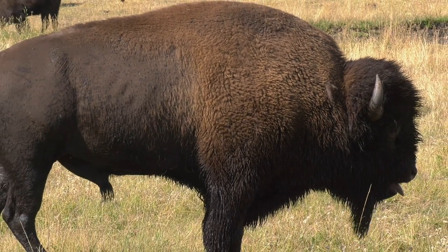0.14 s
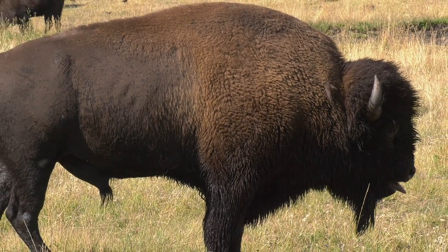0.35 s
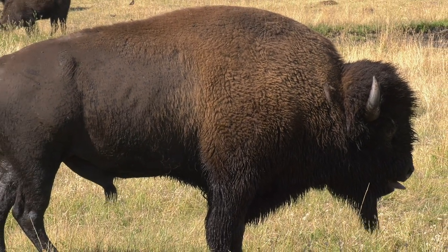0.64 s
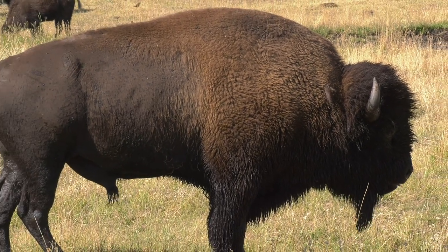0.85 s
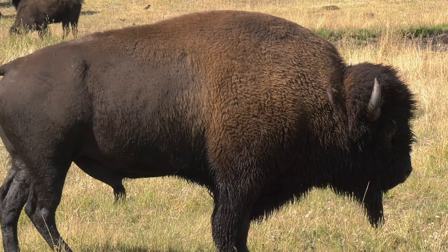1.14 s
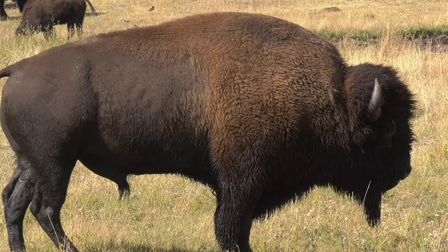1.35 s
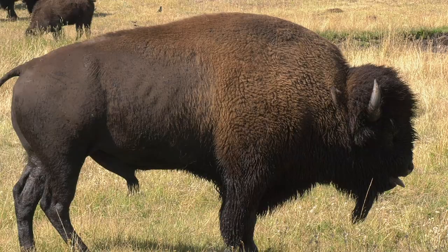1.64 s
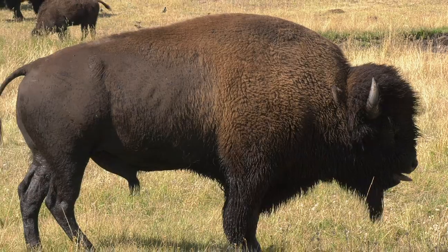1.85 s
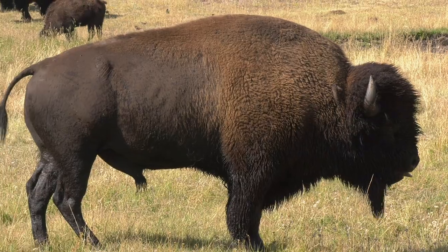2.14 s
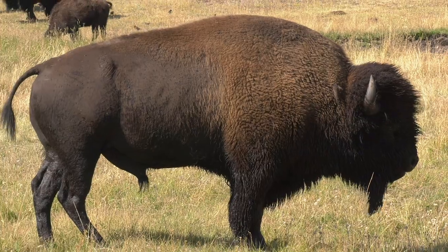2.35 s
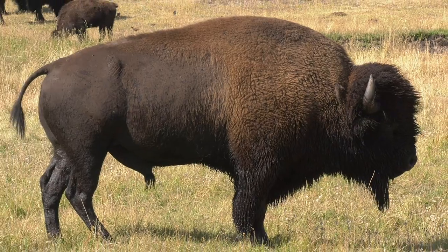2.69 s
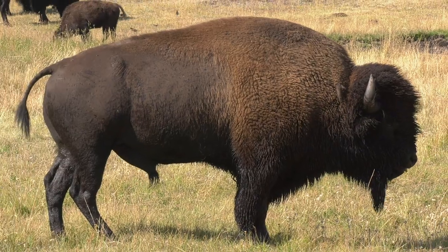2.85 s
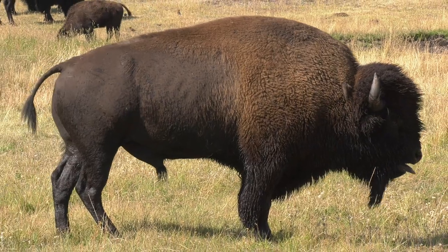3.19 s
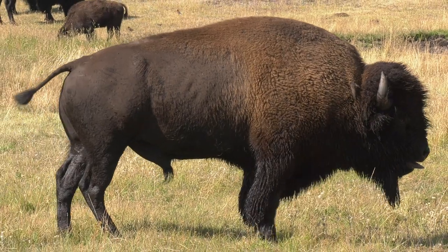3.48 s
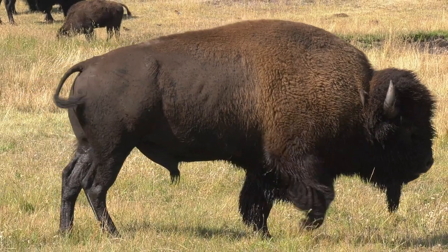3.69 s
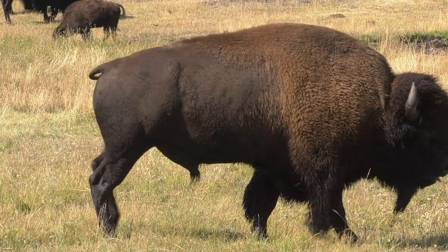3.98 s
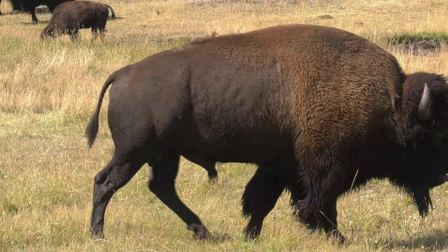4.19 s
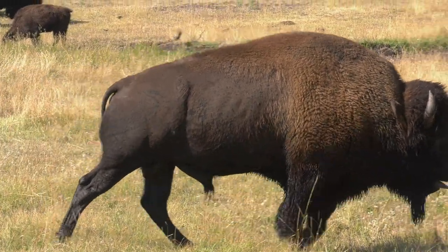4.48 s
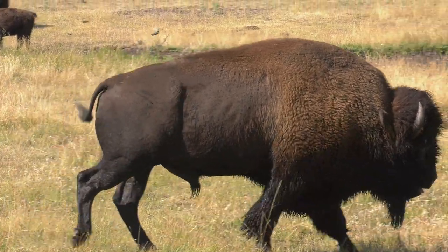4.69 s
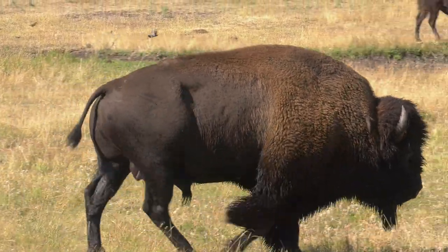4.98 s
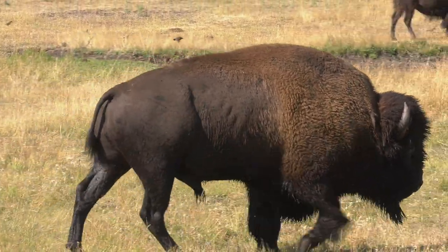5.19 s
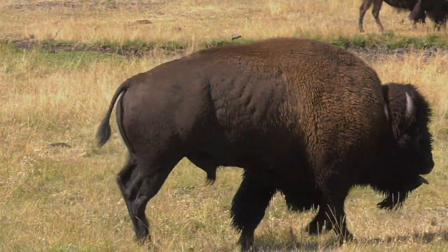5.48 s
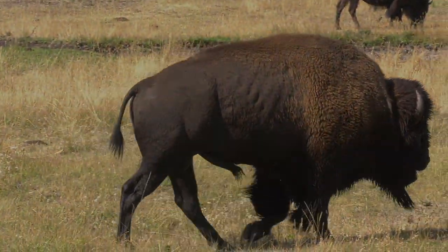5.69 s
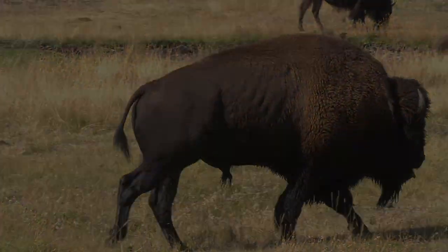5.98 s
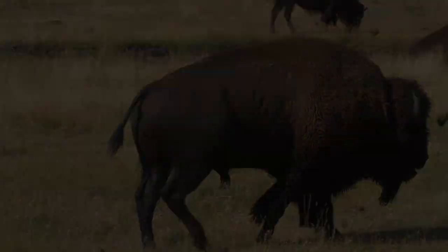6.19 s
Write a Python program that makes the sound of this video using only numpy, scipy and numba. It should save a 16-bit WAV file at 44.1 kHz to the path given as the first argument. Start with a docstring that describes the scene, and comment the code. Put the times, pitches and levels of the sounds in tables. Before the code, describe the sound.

Deep throaty bison grunts and breathy huffs, a quick sniff, then a harsh overloaded roar, with faint bird chirps in an open rumbling meadow.

```python
"""Open meadow: far bison rumble and bellow, dry grass rustles and a small bird gives thin falling chirps throughout.
Close to the microphones, on the left, a bison bull gives four short grunts, each ending in a huff; he sniffs
after the second. Last comes his long rasping roar. His slack vocal folds flap in slow pulses that ring the throat,
rough air sounds the mouth, and single heavy slaps of the folds are loud enough to be clipped on the left."""
import sys
import numpy as np
from scipy import signal
from scipy.fft import rfft, irfft
from scipy.io import wavfile
from scipy.ndimage import uniform_filter1d
from numba import njit

SR = 44100
rng = np.random.default_rng(int(sys.argv[2]) if len(sys.argv) > 2 else 0)


def unload_audio(sound):
    """Save the sound as a 16-bit wav file, at the path given as the first command line argument."""
    columns = np.transpose(np.atleast_2d(sound))
    # keep every value between -1 and 1, then stretch to whole-number steps
    steps = np.round(np.clip(columns, -1, 1) * 32767)
    wavfile.write(sys.argv[1], SR, steps.astype(np.int16))


N = 279573
TIME = np.arange(N) / SR


def from_db(db):
    """Decibels to gain."""
    return 10 ** (np.asarray(db) / 20)


def rms_one(x):
    """Scale to an rms of 1."""
    return x / np.sqrt(np.mean(x ** 2) + 1e-20)


def in_time(rows):
    """Each column of a curve at every sample."""
    s, *columns = np.transpose(rows)
    return [np.interp(TIME, s, c) for c in columns]


def during(rows):
    """1 while a curve lasts, with soft edges."""
    lasts = (TIME > rows[0][0]) & (TIME < rows[-1][0])
    return uniform_filter1d(1. * lasts, size=400)


def envelope(s, attack_s, hold_s, release_s):
    """Full from s for the hold; attack and release each span 20 dB."""
    away = np.maximum((s - TIME) / attack_s, (TIME - s - hold_s) / release_s)
    return from_db(-20 * np.clip(away, 0, 10))


def at_hz(points):
    """A spectrum table at every Fourier bin, interpolated over log frequency."""
    hz, value = np.transpose(points)
    return np.interp(np.log(np.fft.rfftfreq(N, 1 / SR) + 1), np.log(hz), value)


def noise(colour):
    """Noise of a given spectrum, rms 1."""
    spectrum = rfft(rng.standard_normal(N)) * from_db(at_hz(colour))
    return rms_one(irfft(spectrum, N))


def low_pass(x, hz, order=2):
    """Butterworth low-pass."""
    return signal.sosfilt(signal.butter(order, min(hz, SR / 3), fs=SR, output="sos"), x + 1e-18)


def high_pass(x, hz, order=2):
    """Butterworth high-pass."""
    return signal.sosfilt(signal.butter(order, hz, "high", fs=SR, output="sos"), x + 1e-18)


def drift(hz):
    """Slow chance, spread 1."""
    return rms_one(low_pass(rng.standard_normal(N), hz))


def resonate(x, modes):
    """Parallel resonances of alternating sign."""
    out = 0
    for k, (hz, width, db) in enumerate(modes):
        r = np.exp(-np.pi * width / SR)
        poles = [1, -2 * r * np.cos(2 * np.pi * hz / SR), r * r]
        gain = (-1) ** k * from_db(db) * (1 - r * r) / 2
        out = out + gain * signal.lfilter([1, 0, -1], poles, x + 1e-18)
    return out


@njit
def glide(x, hz, width):
    """One resonance whose centre moves."""
    out, state = np.zeros(len(x)), 0j
    for i in range(len(x)):
        if x[i] != 0 or abs(state) > 1e-9:
            state = state * np.exp((-np.pi * width + 2j * np.pi * hz[i]) / SR) + x[i]
            out[i] = state.imag
    return out


def even(x):
    """Take the slow level out, keep the single pulses."""
    return x / np.sqrt(np.abs(uniform_filter1d(x * x, size=2000)) + 0.0015 * np.max(x * x))


def folds(rows, jitter, shimmer_db, width_hz):
    """Uneven fold pulses ring the throat and thump the chest; returns the pulses and the low voice."""
    rate, throat_hz, db = in_time(rows)
    flapping = (TIME > rows[0][0]) * (TIME < rows[-1][0])
    cycles = np.cumsum(rate * (1 + jitter * drift(30)) * flapping) / SR
    pulses = np.diff(np.ceil(cycles), prepend=0) * from_db(shimmer_db * rng.standard_normal(N))
    chest = from_db(-5) * glide(pulses, .7 * throat_hz, 70.)
    body = high_pass(glide(pulses, throat_hz, width_hz) + chest, np.min(throat_hz) / 2)
    return pulses, even(low_pass(body, 259, order=4)) * from_db(db) * during(rows)


# far bellows, each sinking in tone: t/s, length/s, pulse f/Hz, start f/Hz, end f/Hz, peak level/dB
FAR_BELLOWS = [(0.438, 0.1, 80, 88, 76, -20.5), (.53, 0.31, 52.6, 244, 133, -20),
               (2.12, 0.16, 82, 108, 72, -24.5)]
# they peak at this share of their length, after a small swell and before a deep fade
FAR_PEAK_SHARE, FAR_SWELL_DB, FAR_FADE_DB = 0.63, 7, 20


def far_bellow(s, length, rate, start_hz, end_hz, db):
    """Only the low voice of a far bull carries: it swells, sinks in tone and fades."""
    effort = [(0, -FAR_SWELL_DB), (FAR_PEAK_SHARE, 0), (1, -FAR_FADE_DB)]
    rows = [(s + u * length, rate, start_hz + u * (end_hz - start_hz), db + effort_db)
            for u, effort_db in effort]
    return folds(rows, jitter=.14, shimmer_db=2.5, width_hz=26.)[1]


# spectrum of the distant bed: f/Hz, relative level/dB
MEADOW = [(12, -55), (20, -4.5), (37, -44), (60, -2), (107, -2.5), (163, 2), (187, -3.5), (216, -6.5),
          (357, -16.5), (513, -20), (1610, -34.5), (2910, -40), (4810, -43), (11400, -46), (16000, -48)]
# left microphone against right: f/Hz, level difference/dB
MEADOW_SIDE = [(60, 15.7), (110, 7.7), (200, 5.6), (380, 9.7), (700, 8.1), (1290, 11.7), (2380, 5.2),
               (4400, 3.9), (8120, 3.8), (15000, 3.2)]
# likeness of the two microphones: f/Hz, correlation (-1 to 1)
MEADOW_LIKENESS = [(60, -0.29), (130, 0.27), (290, 0.3), (640, 0.2), (1410, -0.22), (3100, -0.03),
                   (6820, -0.17), (15000, 0.016)]
MEADOW_DB = -27   # average of both sides, before the slow drift


def herd():
    """Far bulls blend into a low rumble under a faint hiss; a few bellows stand out."""
    alike, side_db = np.clip(at_hz(MEADOW_LIKENESS), -1, 1), at_hz(MEADOW_SIDE)
    mid, side = rfft(noise(MEADOW)), rfft(noise(MEADOW))
    flip = np.array([[1], [-1]])   # left, right
    spread = np.sqrt(1 + alike) * mid + flip * np.sqrt(1 - alike) * side
    bed = irfft(spread * from_db(flip * side_db / 2), N)
    bed = bed / np.std(bed.mean(axis=0)) * from_db(MEADOW_DB + drift(1.15))
    far = sum(far_bellow(*row) for row in FAR_BELLOWS)
    return bed + far * from_db([[3], [-6]])


# dry grass under hooves and tail: t/s, length/s, centre f/Hz, level/dB before the left and right gains
RUSTLES = [(0.443, .094, 3470, -54.5), (1.282, 0.096, 2800, -54.5), (2.603, 0.088, 2900, -62),
           (3.986, .35, 7850, -58.5), (4.636, .099, 2820, -50.5), (4.688, 0.29, 8900, -58.5),
           (4.949, .069, 2490, -51.5), (5.118, 0.0078, 1310, -37.5)]


def grass(grain_db):
    """Dry stalks brush and snap in short grainy swishes."""
    out = np.zeros(N)
    for s, length, hz, db in RUSTLES:
        n = int(length * SR)
        grains = rng.standard_normal(n) * from_db(grain_db * rng.standard_normal(n)) * np.hanning(n)
        swish = rms_one(resonate(grains, [(hz, 0.29 * hz, 0)]))
        out[int(s * SR):int(s * SR) + n] += from_db(db) * swish
    return out


def whistle(s, hz, db, upper_ratio):
    """One bird note along a pitch line; the two sides of the syrinx waver and sing slightly apart."""
    u = np.linspace(0, 1, len(hz))
    waver = 1 + .014 * rms_one(low_pass(rng.standard_normal((2, len(u))), 400))
    cycles = np.cumsum(hz * waver * [[1], [upper_ratio]], axis=1) / SR
    lower, upper = np.sin(2 * np.pi * cycles)
    note = from_db(db) * np.sqrt(4 * u * (1 - u)) * (lower + .5 * upper)
    return np.pad(note, (int(s * SR), N))[:N]


# falling chirps: t/s, length/s, f/Hz they fall towards, level/dB before the left and right gains
CHIRPS = [(.241, 0.059, 8100, -42.5), (0.57, 0.068, 8800, -50), (1.518, .054, 8840, -43),
          (1.875, .057, 7840, -43.5), (3.09, .085, 8660, -50.5), (4.4, 0.063, 7560, -46),
          (4.92, .067, 8400, -54)]
CHIRP_START_RATIO = 1.12
# one lower, arched peep: t/s, length/s, foot f/Hz, top f/Hz, level/dB before the left and right gains
PEEP = (.517, .055, 5300, 6100, -52)


def bird(bend, upper_ratio):
    """The peep rises and falls; each chirp falls fast and levels off."""
    s, length, foot_hz, top_hz, db = PEEP
    arch = np.sin(np.linspace(0, np.pi, int(length * SR)))
    out = whistle(s, foot_hz + (top_hz - foot_hz) * arch, db, upper_ratio)
    for s, length, end_hz, db in CHIRPS:
        fall = np.exp(-bend * np.linspace(0, 1, int(length * SR)))
        out = out + whistle(s, end_hz * (1 + (CHIRP_START_RATIO - 1) * fall), db, upper_ratio)
    return out


def scatter(x, t60, dull_hz):
    """Ground and grass send back a weak dull tail, different on each side."""
    decay = from_db(-60 * TIME[:SR] / t60)
    tail = low_pass(rng.standard_normal((2, SR)), dull_hz) * decay
    tail = tail / np.sqrt(np.sum(decay ** 2))
    return signal.fftconvolve(x[None], tail, axes=1)[:, :N]


# the sniff after the second grunt: t/s, length/s, level/dB before the microphone gains
SNIFF = (2.052, 0.11, -35)
# spectrum of the nostril air: f/Hz, relative level/dB
SNIFF_COLOUR = [(100, -10), (300, 16), (700, -2), (1100, -6), (1450, 1.5), (2200, -26), (3400, -10.5),
                (4600, -12), (6000, -20), (9000, -20), (14000, -36)]
SNIFF_ATTACK_S, SNIFF_RELEASE_S = 0.046, .12


def sniff():
    """A short pull of air through the bull's nostrils."""
    s, length, db = SNIFF
    return from_db(db) * envelope(s, SNIFF_ATTACK_S, length, SNIFF_RELEASE_S) * noise(SNIFF_COLOUR)


# air as the grunts end: t/s, length/s, rush level/dB, parted lips level/dB (before flutter and gains)
HUFFS = [(0.301, 0.0096, -25, -34), (0.349, 0.036, -30.5, -39.5), (1.692, 0.014, -25, -34),
         (1.744, 0.034, -35, -34), (3.123, 0.022, -37, -45), (3.183, 0.0095, -31, -35.5),
         (3.227, 0.046, -27.5, -38), (4.215, 0.041, -32.5, -34), (4.349, 0.04, -29, -31.5)]
# spectrum of rushing air, also in the slaps and the roar: f/Hz, relative level/dB
HUFF_COLOUR = [(150, -7), (290, 9.5), (380, -13.5), (580, -3), (780, -15), (950, 5.5), (1250, -1),
               (1720, -9.5), (1950, -16), (2700, -17), (3700, -33), (5000, -27.5), (9000, -40),
               (16000, -45)]
# resonances of the parted lips: f/Hz, width/Hz, relative level/dB
LIPS = [(600.7, 29, 10), (1040, 220, -5.5), (1155, 24, -9), (1453, 54, 4), (1660, 108, 4.5),
        (2200, 340, -10), (2640, 72, -12.5), (2860, 110, -13), (4960, 420, -21.5)]
# a huff rises and dies by 20 dB in these multiples of its length
HUFF_RISE, HUFF_FALL = 0.75, 2.54
# the dull puff in each huff, level relative to its rush
PUFF_DB, PUFF_HZ = -1.5, 330


def huffs(flutter_db):
    """Unvoiced air rushes out in a fluttering stream with a dull puff and sounds the parted lips."""
    puff = rms_one(low_pass(rng.standard_normal(N), PUFF_HZ))
    rush = noise(HUFF_COLOUR) + from_db(PUFF_DB) * puff
    lips = rms_one(resonate(rng.standard_normal(N), LIPS))
    out = 0
    for s, length, rush_db, lips_db in HUFFS:
        breath = envelope(s, HUFF_RISE * length, length, HUFF_FALL * length)
        out = out + breath * (from_db(rush_db) * rush + from_db(lips_db) * lips)
    return out * from_db(flutter_db * drift(70))


# heaviest slaps of the folds, before the microphone gains:
# t/s, blow level/dB, ring level/dB, ring f/Hz, time the folds stay shut/s
SLAPS = [(0.2599, 3.5, 7, 218, 0.034), (0.3065, -13, -8.5, 216, 0.027), (1.661, -10, -7.5, 211.5, 0.034),
         (1.702, -7.5, -18, 194, 0.011), (3.0554, -1.5, -8, 225, .013), (3.0972, -6.5, -15.5, 238, .022),
         (4.1435, -5.5, -13.5, 200, 0.0063), (4.1832, 1, -7, 251, 0.022), (4.2576, 3.5, -3, 253, 0.024),
         (4.3007, 0, -12.5, 259, 0.031), (5.531, 0.5, 0, 213, .01), (5.562, 1, 1, 206, 0.012),
         (5.5921, -2, 4, 242.6, 0.038), (5.621, 5.5, -2, 238.5, .028), (5.683, -3, -14, 218, .02),
         (5.7229, -5, -11.5, 240, .023), (5.7395, 6, 2, 209, 0.015), (5.767, -1.5, 4, 230.8, 0.06),
         (5.7925, 13.5, 4.5, 246.7, .055), (6.1024, -3.5, 0, 210.6, 0.01646), (6.156, -6, -2, 215.2, 0.046),
         (6.252, -2, 0.5, 203, .07)]


def folds_shut():
    """1 while the folds stay shut after a slap, 0 while they flutter."""
    shut = np.zeros(N)
    for s, *_, shut_s in SLAPS:
        shut[int((s - .004) * SR):int((s + shut_s) * SR)] = 1
    return uniform_filter1d(shut, size=200)


# resonances of the open throat and mouth, also in the roar: f/Hz, width/Hz, relative level/dB
TRACT = [(1040, 100, 1), (1364, 85, 0), (1740, 110, -3.5), (2350, 300, -25), (2865, 80, -21)]
CRACK_DB = -11.5   # the crack of air, relative to the blow


def slaps(ring_t60, thump_hz, thump_t60, crack_t60, mouth_db):
    """Air squeezes out as the folds close; the slap thumps, and the throat rings until they part again."""
    low, burst, t = np.zeros(2 * N), np.zeros(2 * N), TIME[:SR // 6]
    for s, blow_db, ring_db, hz, shut_s in SLAPS:
        start, crack_db = int(s * SR), blow_db + CRACK_DB
        span = slice(start, start + len(t))
        ring = from_db(ring_db - 60 * t / ring_t60) / (1 + (t / shut_s) ** 8)
        low[span] += ring * np.sin(2 * np.pi * hz * t)
        low[span] += from_db(blow_db - 60 * t / thump_t60) * np.sin(2 * np.pi * thump_hz * t)
        low[span] += from_db(blow_db + mouth_db - 60 * t / 0.04) * np.sin(2 * np.pi * 630 * t)
        burst[span] += from_db(crack_db - 60 * t / crack_t60) * np.minimum(t / 0.0013, 1)
        squeeze = np.linspace(0, 1, SR // 60)
        burst[start - len(squeeze):start] += from_db(min(crack_db, -9) - 13.5) * squeeze
    burst = burst[:N]
    crack = burst * noise(HUFF_COLOUR) + 3 * resonate(burst * rng.standard_normal(N), TRACT)
    spray = from_db(-34.0) * burst * rng.standard_normal(N)
    return low_pass(low[:N], 900, order=4) + crack + spray


def puffs(pulses, open_s, leak):
    """Air passes in a puff at each pulse, and some leaks in between."""
    opened = signal.lfilter([1], [1, -np.exp(-1 / (open_s * SR))], pulses + 1e-18)
    return even(low_pass(opened, 210) + leak)


# fluttering grunts, before the microphone gains:
# t/s, swell/s, fade/s, pulse f/Hz, throat f/Hz at the peak, peak level/dB, air level/dB
GRUNTS = [(.056, 0.1728, 0.014, 43.5, 230, -8, -33), (1.46, .115, .078, 46.3, 240, -8.5, -30)]
# spectrum of the grunt's air: f/Hz, relative level/dB
GRUNT_COLOUR = [(300, -10), (550, -2), (720, -33), (830, 7), (1070, -1), (1250, 1.5), (1430, 1.5),
                (1700, -13.5), (2050, -16), (2400, -13), (3500, -29.5), (8000, -34)]
# upper resonances of the tract, also in the roar: f/Hz, width/Hz, relative level/dB
TRACT_TOP = [(3230, 170, -6), (3900, 160, 0), (4150, 160, -3), (5480, 350, -12), (6200, 300, -12),
             (6800, 300, -14), (8350, 700, -9)]
# a grunt swells by this much and then sags; the throat resonance rises with the effort
GRUNT_SWELL_DB, GRUNT_SAG_DB_PER_S, THROAT_HZ_PER_DB = 18, 139, 3
# the air of a grunt comes up early and then holds; its treble is much weaker
GRUNT_TREBLE_DB, GRUNT_AIR_ATTACK_S, GRUNT_AIR_RELEASE_S = -29.5, 0.076, .016


def grunts():
    """Mouth nearly shut: a boomy flutter swells and sags, with a little air on each pulse."""
    out = 0
    for s, swell_s, fade_s, rate, throat_hz, db, air_db in GRUNTS:
        peak_s = s + swell_s
        effort = [(s, -GRUNT_SWELL_DB), (peak_s, 0), (peak_s + fade_s, -GRUNT_SAG_DB_PER_S * fade_s)]
        rows = [(t, rate, throat_hz + THROAT_HZ_PER_DB * effort_db, db + effort_db)
                for t, effort_db in effort]
        pulses, boom = folds(rows, jitter=.012, shimmer_db=.7, width_hz=29.)
        gate = puffs(pulses, open_s=.007, leak=.2)
        hold_s = swell_s + fade_s - GRUNT_AIR_ATTACK_S
        air = envelope(s + GRUNT_AIR_ATTACK_S, GRUNT_AIR_ATTACK_S, hold_s, GRUNT_AIR_RELEASE_S)
        treble = rms_one(resonate(rng.standard_normal(N), TRACT_TOP))
        hiss = noise(GRUNT_COLOUR) + from_db(GRUNT_TREBLE_DB) * treble
        out = out + boom * from_db(-10 * folds_shut()) + from_db(air_db) * hiss * gate * air
    return out


def wander(x, depth_s):
    """The soft tract keeps moving: a drifting delay slides its resonances slightly up and down."""
    return np.interp(TIME + depth_s * drift(12), TIME, x)


# the long roar, levels relative within it: t/s, pulse f/Hz, voice level/dB, air level/dB, mouth opening (0-1)
ROAR = [(5.301, 53.8, -42, -38, 0.04), (5.335, 54, -25, -28.5, 0), (5.4, 54.1, -6.5, -18, 0.62),
        (5.5, 45.7, -11.5, -25.5, 0.77), (5.629, 34.85, -3.5, -28, 1), (5.695, 45, -22.5, -20.5, 0.93),
        (5.77, 45, 1, -25.5, 1), (5.86, 62, -7, -20.5, 0.9), (5.95, 62, -11.5, -24.5, 0.98),
        (6.02, 47.3, -11, -29, 0.72), (6.27, 47.3, -9, -28.5, 0.42), (6.34, 46.6, 3, -17, 0.66)]
# the throat resonance rises as the mouth opens and sinks as the larynx draws back
THROAT_HZ, THROAT_OPENING_HZ, THROAT_SINK_HZ_PER_S = 209, 37, 28.7
# the second resonance starts high, settles and slowly fades
VOWEL_HZ, VOWEL_ONSET_HZ, VOWEL_SETTLE_S = 629.5, 110, .11
VOWEL_DB, VOWEL_FOLLOWS_VOICE, VOWEL_FADE_DB_PER_S = -11.5, 0.82, 15
# the wheeze gets out through the open mouth: level when shut, rise when fully open
WHEEZE_DB, WHEEZE_OPENING_DB = -56, 21
CHOKE_DB = -1   # change in the roar's air while the folds stay shut after a slap


def roar():
    """Mouth open: rough pulses and uneven puffs of air excite all the resonances of the tract."""
    start = ROAR[0][0]
    age = np.maximum(TIME - start, 0)
    _, voice_db, air_db, opening = in_time(ROAR)
    rows = [(s, rate, THROAT_HZ + THROAT_OPENING_HZ * mouth - THROAT_SINK_HZ_PER_S * (s - start), db)
            for s, rate, db, _, mouth in ROAR]
    unrest = np.interp(TIME, [5.45, 5.55], [.012, .18])   # the folds start evenly, then stumble
    pulses, boom = folds(rows, jitter=unrest, shimmer_db=2.2, width_hz=30.)
    gate = low_pass(puffs(pulses, open_s=.0035, leak=0.11), 170)
    gate = even(gate * from_db(2.1 * drift(40)))
    source = gate * rng.standard_normal(N) + 30 * pulses
    vowel_hz = VOWEL_HZ + VOWEL_ONSET_HZ * np.exp(-age / VOWEL_SETTLE_S)
    vowel_db = VOWEL_DB + VOWEL_FOLLOWS_VOICE * voice_db - VOWEL_FADE_DB_PER_S * age
    vowel = from_db(vowel_db) * even(glide(source, vowel_hz, 26.0))
    # each puff gurgles upward: every higher resonance speaks 3 ms after the one below
    gurgle = sum(resonate(np.roll(source, k * SR // 330), [mode]) for k, mode in enumerate(TRACT))
    rasp = from_db(air_db - 1) * even(low_pass(gurgle, 2500, order=3))
    spray = (gate + .3) * rng.standard_normal(N)
    wheeze = resonate(spray, TRACT_TOP) + resonate(spray, [(3740, 3200, -12.5)])
    wheeze = wander(even(low_pass(wheeze, 9000)), depth_s=.0003)
    wheeze = from_db(WHEEZE_DB + WHEEZE_OPENING_DB * opening) * wheeze
    rush = from_db(air_db - 7) * gate * noise(HUFF_COLOUR)
    shut = folds_shut()
    air = (rasp + wheeze + rush) * from_db(CHOKE_DB * shut)
    return boom * from_db(-10 * shut) + (vowel + air) * during(ROAR)


def scene():
    """The bull is much stronger on the left, less so in the treble; the meadow lies all around."""
    heavy = slaps(ring_t60=0.37, thump_hz=170.6, thump_t60=0.038, crack_t60=0.023, mouth_db=-15)
    voice = grunts() + roar() + heavy
    bull = high_pass(voice, 60.3) + huffs(flutter_db=2.5) + sniff()
    left = from_db(4.5) * bull
    treble = bull - low_pass(bull, 3200, order=1)
    right = from_db(-14.5) * bull + from_db(-12.5) * treble + resonate(bull, [(1100, 290, -21.5)])
    right = np.pad(right, (2, 0))[:N]   # the far microphone hears him two samples later
    echo = scatter(bull, t60=.7, dull_hz=4000) * from_db([[-21], [-22]])
    small = (bird(bend=2.8, upper_ratio=1.065) + grass(grain_db=6)) * from_db([[2], [-3]])
    return np.array([left, right]) + echo + small + herd()


CUTOFF_HZ = 16000


def record(dry):
    """Loud peaks are flattened at full scale with a short knee, and the top is cut."""
    clipped = dry / (1 + dry ** 10) ** .1
    top_cut = signal.firwin(255, CUTOFF_HZ, fs=SR)[None]
    return signal.fftconvolve(clipped, top_cut, mode="same", axes=1)


dry = scene()
out = record(dry)
unload_audio(out)
```